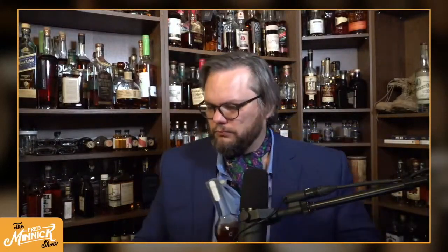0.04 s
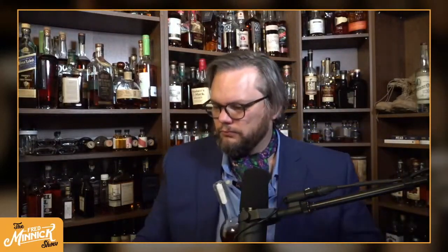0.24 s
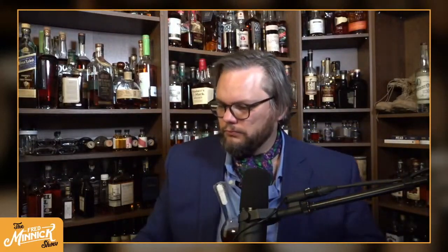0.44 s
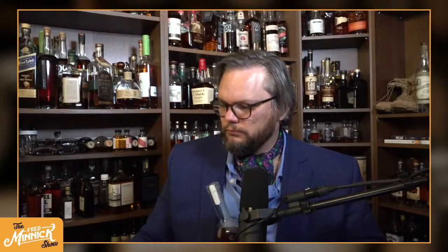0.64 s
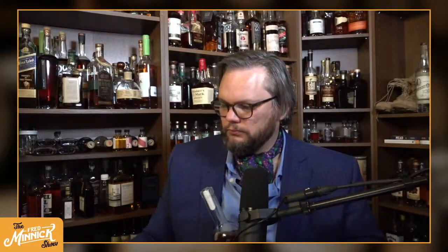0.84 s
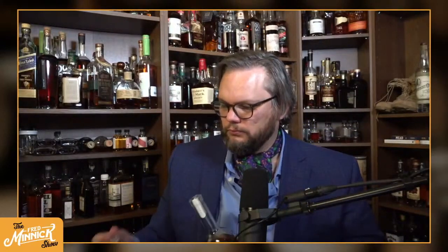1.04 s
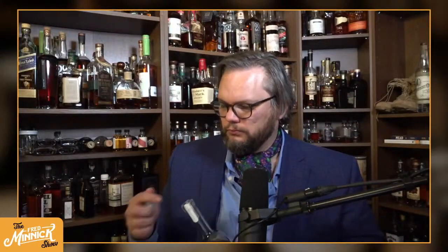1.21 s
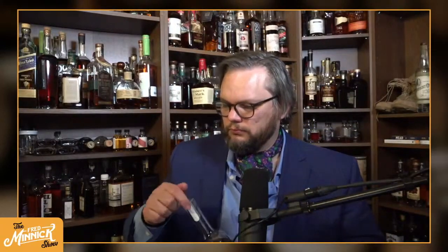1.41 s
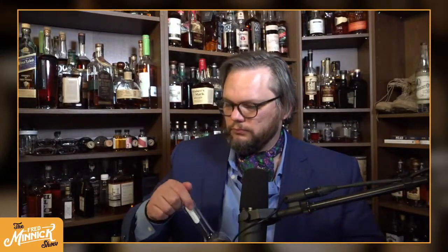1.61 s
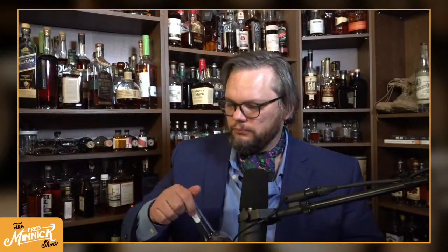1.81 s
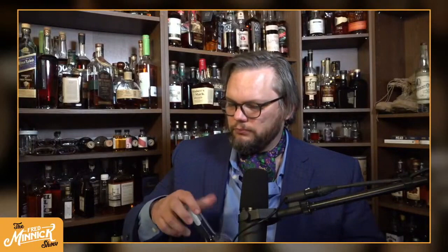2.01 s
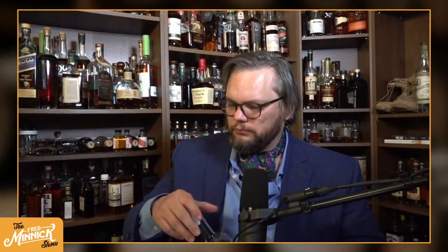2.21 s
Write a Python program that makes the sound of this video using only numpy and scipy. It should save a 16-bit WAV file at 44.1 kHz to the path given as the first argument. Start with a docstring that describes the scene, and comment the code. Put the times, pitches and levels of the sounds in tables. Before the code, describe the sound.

A bottle lands on a wooden desk with a dull thump. After a pause, a glass tube knocks against a tasting glass with two sharp clinks and a few light ticks, close to the microphone in a small, quiet room.

```python
"""Bottle on a desk, glass on glass

A bottle lands on a wooden desk with a dull thump that shakes the microphone arm. Then a glass
tube knocks against a tasting glass: two sharp clinks, light ticks and a last touch. Each impact
excites damped modes, heard through a close microphone in a small, quiet, furnished room."""
import sys
import numpy as np
from scipy import signal
from scipy.fft import rfft, irfft
from scipy.io import wavfile

SR = 44100
rng = np.random.default_rng(int(sys.argv[2]) if len(sys.argv) > 2 else 0)


def transcribe(u):
    """Save the signal u as a 16-bit wav file named by the first command-line argument.

    u: samples, shape (n,) or (channels, n), limited to [-1, 1]; the rate is SR.
    q: integer samples, one column per channel.
    """
    v = np.clip(np.atleast_2d(u).T, -1, 1)
    q = np.round(v * 32767).astype(np.int16)
    wavfile.write(sys.argv[1], SR, q)


N = 103635
T = np.arange(N) / SR
FREQS = np.maximum(np.fft.rfftfreq(2 * N, 1 / SR), 1)


def undb(db):
    """Amplitude ratio of a level in decibels."""
    return 10 ** (np.asarray(db) / 20)


def fade(t60):
    """Exponential decay: 60 dB in t60 seconds."""
    return np.exp(-np.log(1000) * T / t60)


def swell(rise):
    """Exponential approach to 1 with time constant rise."""
    return 1 - np.exp(-T / rise)


def add(out, start, x):
    """Superposition: x joins out at the start time."""
    i = int(start * SR)
    out[i:] += x[:N - i]


def colour(points):
    """Spectral envelope through (Hz, dB) points."""
    hz, db = np.array(sorted(points)).T
    return undb(np.interp(np.log(FREQS), np.log(hz), db))


def noise(gain):
    """Random phases turn a spectrum into noise of unit rms."""
    x = irfft(gain * np.exp(2j * np.pi * rng.random(N + 1)))[:N]
    return x / x.std()


def tilt(hz, db_per_octave, pivot_hz):
    """Spectral tilt: a harder contact favours high frequencies."""
    return undb(db_per_octave * np.log2(hz / pivot_hz))


def ring(hz, t60):
    """Free vibration of one damped mode."""
    return np.sin(2 * np.pi * hz * T) * fade(t60)


def room(x, wet_db, bass_t60=0.31, treble_t60=0.2, delay_s=0.004):
    """Reverberation: a diffuse tail follows the direct sound, its treble dying sooner."""
    low = 1 / (1 + (FREQS / 4000) ** 2)
    hiss = rfft(rng.standard_normal(N), 2 * N)
    bass = irfft(hiss * low)[:N] * fade(bass_t60)
    treble = irfft(hiss * (1 - low))[:N] * fade(treble_t60)
    tail = (bass + treble) * (T > delay_s)
    return x + undb(wet_db) * signal.fftconvolve(x, tail / np.linalg.norm(tail))[:N]


def hum(hz=142, half_width_hz=1.9):
    """Beating: a tone wavers as it interferes with narrow-band noise."""
    band = noise(1 / (1 + ((FREQS - hz) / half_width_hz) ** 2))
    return undb(-79) * (np.sin(2 * np.pi * hz * T) + 0.55 * band)


# Envelope of a sleeve's rustle (time [s], level [dB])
SLEEVE_LEVELS = [(0, -88), (.33, -88), (.45, -75.5), (.66, -78.5), (.76, -73), (.9, -81), (1.1, -88),
                 (2.35, -82.5)]
# Spectrum of the rustle (frequency [Hz], relative density [dB])
SLEEVE_SPECTRUM = [(150, -2), (350, -3), (800, -9), (1500, -10), (3000, -19.5), (8000, -37.5)]
# Envelope of the handling rumble (time [s], level [dB])
RUMBLE_LEVELS = [(0, -86), (.3, -68.5), (.7, -66.5), (.9, -73), (1.03, -63), (1.2, -68), (1.42, -59.5),
                 (1.6, -70), (2.35, -71)]

def handling(corner_hz=19):
    """Amplitude-modulated noise: a sleeve rustles faintly over a deep handling rumble."""
    rustle = noise(colour(SLEEVE_SPECTRUM))
    rustle *= undb(np.interp(T, *np.array(SLEEVE_LEVELS).T))
    rumble = noise(FREQS / (1 + (FREQS / corner_hz) ** 5))
    rumble *= undb(np.interp(T, *np.array(RUMBLE_LEVELS).T))
    return rustle + rumble


# Spectrum of the room's hiss (frequency [Hz], relative density [dB])
HISS_SPECTRUM = [(35, -29.5), (60, 0.5), (71, -16), (91, -10), (156, -4.5), (464, -25.5), (642, -17),
                 (721, -22.5), (931, -21.5), (1590, -22.5), (1910, -21.5), (2980, -23), (15500, -25.5)]

def room_hiss():
    """Stationary noise: the floor of the quiet room."""
    return undb(-74) * noise(colour(HISS_SPECTRUM))


# Contacts of the bottle's base (time [s], gain [dB], tilt [dB/octave])
BASE_CONTACTS = [(0.1995, 2.5, -0.04), (0.2110, 0.5, -2), (0.2187, -3.5, 0.5), (0.231, -12.5, 2)]
# Modes of the desk (frequency [Hz], T60 [s], relative level [dB])
DESK_MODES = [(100, .3, -49), (141, .35, -52), (172, .3, -50), (286, .2, -46), (581, .15, -45),
              (650, .18, -45), (868, .15, -42), (1006, .15, -44), (1320, .18, -46), (2290, .2, -51),
              (3120, .18, -54), (323, .25, -44), (385, .23, -35), (419, .21, -44), (772, .21, -36.5),
              (922, .17, -40), (959, .17, -38), (1214, .22, -44)]
# Dense clatter of wood and bottle (frequency [Hz], relative density [dB])
CLATTER_SPECTRUM = [(60, -14.5), (170, -8), (220, -23), (370, 0), (540, -11), (850, -2.5), (1300, -8),
                    (1700, -13), (2400, -16.5), (3300, -20.5), (4400, -29.5), (6000, -40.5), (9000, -52.5),
                    (14000, -64)]
# Crack of the first contact (frequency [Hz], relative density [dB])
CRACK_SPECTRUM = [(200, -11.5), (900, 0.5), (2000, -9), (3800, -7), (7000, -17), (11000, -37),
                  (15000, -52.5)]

def bottle(rise_s=0.00093):
    """Impact excitation: the base rocks down, each contact ringing the desk and making it clatter."""
    desk, wood = np.zeros((2, N))
    onset = swell(rise_s)
    for start, db, slope in BASE_CONTACTS:
        modes = sum((-1) ** k * undb(mode_db) * tilt(hz, slope, 800) * ring(hz, t60)
                    for k, (hz, t60, mode_db) in enumerate(DESK_MODES))
        clatter = noise(colour(CLATTER_SPECTRUM) * tilt(FREQS, slope, 800)) * fade(t60=0.071)
        add(desk, start, undb(db) * modes * onset)
        add(wood, start, undb(db - 28.5) * clatter * onset)
    crack = noise(colour(CRACK_SPECTRUM)) * fade(t60=0.018)
    add(wood, BASE_CONTACTS[0][0], undb(-31) * crack * onset)
    return room(desk, wet_db=-16.5) + room(wood, wet_db=-4)


# Sway after the landing (time [s], frequency [Hz], rise [s], T60 [s], level [dB])
ARM_SWAY = [(0.212, 42, .012, 0.26, -26.5)]
# Soft handling bumps (time [s], level [dB], centre frequency [Hz], T60 [s])
HANDLING_BUMPS = [(0.231, -49, 36.6, 1), (0.419, -52, 42, 0.11), (0.727, -54.5, 47.7, 0.35),
                  (1.14, -56.5, 107, 0.11), (1.445, -70, 65, 0.11), (1.849, -53, 51.7, 0.095),
                  (1.891, -56, 70, .1), (1.99, -58, 93, .07), (2.316, -53, 44.5, 0.17)]

def microphone_arm(width_octaves=0.47):
    """Structure-borne sound: the desk sways the arm and conducts bumps to the microphone."""
    out = np.zeros(N)
    for start, hz, rise, t60, db in ARM_SWAY:
        add(out, start, undb(db) * ring(hz, t60) * swell(rise))
    for start, db, hz, t60 in HANDLING_BUMPS:
        thud = noise(np.exp(-0.5 * (np.log2(FREQS / hz) / width_octaves) ** 2))
        add(out, start, undb(db) * thud * fade(t60) * swell(rise=0.0057))
    return out


def at_place(place, levels):
    """Linear interpolation between the levels at striking places 0, 1 and 2."""
    return np.interp(place, np.arange(3), levels)


# Knocks of tube on glass
# (time [s], clack gain [dB], clack T60 [s], ring gain [dB], tilt [dB/octave], striking place)
GLASS_KNOCKS = [(1.4447, 1.5, 0.079, -2, 0, 0), (1.8644, -1, 0.071, -7.5, 0, 0.95),
                (1.9818, -15, 0.012, -32.5, 3, 1.35), (2.0850, -22, 0.019, -35, 0, 1.23),
                (2.3307, -10.5, 0.02, -28, 0.5, 2.4)]
# Glass modes, some in beating pairs (frequency [Hz], T60 [s], relative level at places 0, 1, 2 [dB])
GLASS_MODES = [(1870, 0.095, -33, -47.5, -45), (1935, 0.095, -27.5, -32.5, -44), (1910, 1, -65, -63, -58),
               (2186, .15, -44.5, -54, -46), (2680, .12, -56.5, -62, -65.5), (3665, 0.14, -41.5, -40, -42),
               (4110, 0.23, -51, -40, -27.5), (4240, 0.1, -31, -40.5, -37), (4204, .45, -54, -41, -39),
               (4883, .2, -36.5, -43, -43), (4890.5, .2, -36.5, -43, -49), (6654, .21, -40.5, -49, -51),
               (7841, .15, -40.5, -55, -62), (6100, 0.088, -42, -67, -58), (6570, .12, -50, -36, -46),
               (6710, .12, -54, -43, -57), (6900, 0.14, -54, -42, -44), (8880, 0.22, -62, -59, -35),
               (10350, .15, -53.5, -45.5, -48), (10500, 0.1, -52, -50, -48), (12170, 0.1, -61, -48, -60),
               (13500, .09, -72, -49, -52), (14240, .08, -72, -52, -62)]
# Clack of the damped high modes (frequency [Hz], relative density at places 0, 1, 2 [dB])
CLACK_SPECTRUM = [(150, -19, -8, 0.5), (710, -22, -25, -18), (1370, -24, -17, -24), (1713, -7.5, -5, -25),
                  (1865, 9, 10.5, 11.5), (2177, -22, 5.5, -1), (2700, -6, -9.5, -8), (3670, 0.5, 0.5, 0),
                  (4270, -2, 8, 3.5), (4650, 3, -17, -3), (4630, -0.5, 0, 8), (6200, -20, -14.5, -16),
                  (6430, 4.5, 0, -2.5), (7640, -18, -10, -18), (8700, -20, -8, -5.5),
                  (10500, -21.5, -15, -15), (11450, -27, -24, -33), (15000, -49, -33, -26)]

def clinks(rise_s=0.00027, snap_t60=0.00096):
    """Modal response: a knock snaps, clacks and rings, weighted by where the glass is struck."""
    rings, clacks = np.zeros((2, N))
    onset = swell(rise_s)
    for start, clack_db, clack_t60, ring_db, slope, place in GLASS_KNOCKS:
        modes = sum((-1) ** k * undb(at_place(place, levels)) * tilt(hz, slope, 3500) * ring(hz, t60)
                    for k, (hz, t60, *levels) in enumerate(GLASS_MODES))
        spectrum = colour([(hz, at_place(place, levels)) for hz, *levels in CLACK_SPECTRUM])
        envelope = undb(-24) * fade(snap_t60) + undb(-30.5) * fade(clack_t60)
        clack = noise(spectrum * tilt(FREQS, slope, 4000)) * envelope
        add(rings, start, undb(ring_db) * modes * onset)
        add(clacks, start, undb(clack_db) * clack * onset)
    return rings, clacks


# Low ring of the desk under the glass (time [s], frequency [Hz], T60 [s], level [dB])
DESK_RINGS = [(1.445, 362, 0.39, -69.5), (1.89, 276, 0.17, -55)]

def desk_under_glass():
    """Damped vibration: a low desk mode rings briefly after each of the two sharp clinks."""
    out = np.zeros(N)
    for start, hz, t60, db in DESK_RINGS:
        add(out, start, undb(db) * ring(hz, t60) * swell(rise=0.0057))
    return out


# Grazing contacts of the tube (time [s], level [dB], length [s])
TUBE_GRAZES = [(1.643, -56.5, 0.042), (1.661, -58.5, .04), (1.7014, -58, 0.02), (1.737, -61.5, 0.061),
               (1.805, -66.5, 0.028), (1.8457, -56.5, 0.02), (2.003, -62.5, 0.027), (2.086, -60.5, 0.027)]
# Spectrum of a graze (frequency [Hz], relative density [dB])
GRAZE_SPECTRUM = [(900, -21.5), (1500, -11), (1750, 8), (2000, -7), (2500, -11.5), (3900, -10.5),
                  (5500, -34), (12000, -28)]

def grazes():
    """Friction noise: the tube brushes the glass in faint, short bursts."""
    out = np.zeros(N)
    for start, db, length in TUBE_GRAZES:
        envelope = fade(2 * length) * swell(length / 4)
        add(out, start, undb(db) * noise(colour(GRAZE_SPECTRUM)) * envelope)
    return out


def scene():
    """Superposition of all sources at one microphone."""
    thumps = bottle() + microphone_arm() + desk_under_glass()
    rings, clacks = clinks()
    clacks += grazes()
    glassware = room(rings, wet_db=-17) + room(clacks, wet_db=-9.5)
    background = hum() + handling() + room_hiss()
    return (thumps + glassware + background)[None]


def record(dry, cutoff_hz=15650):
    """Band limiting: a steep elliptic low-pass removes the highest treble."""
    return signal.sosfilt(signal.ellip(10, 0.2, 70, cutoff_hz, fs=SR, output="sos"), dry)


dry = scene()
out = record(dry)
transcribe(out)
```